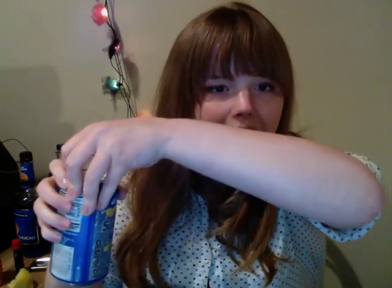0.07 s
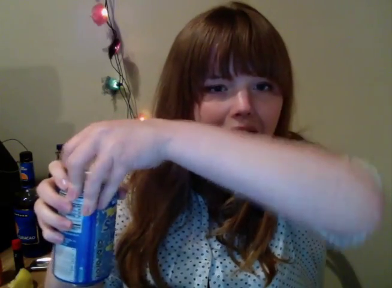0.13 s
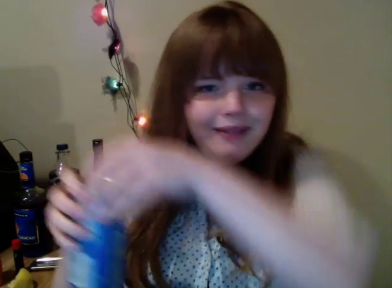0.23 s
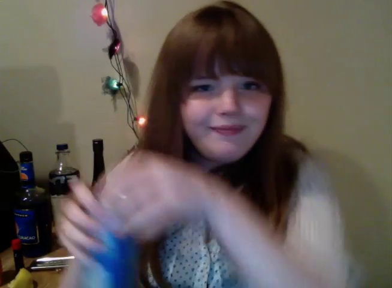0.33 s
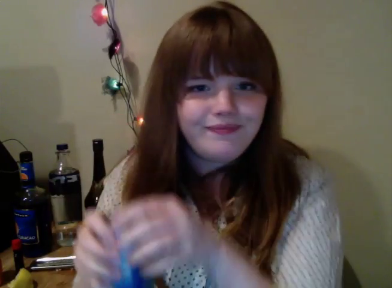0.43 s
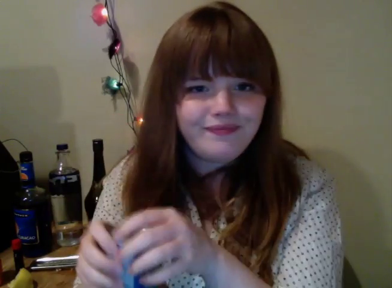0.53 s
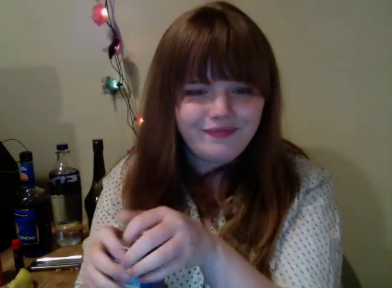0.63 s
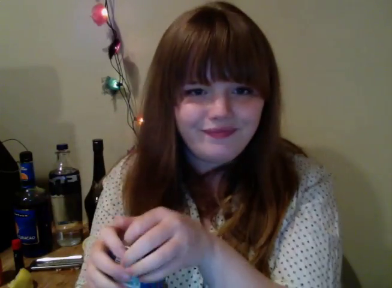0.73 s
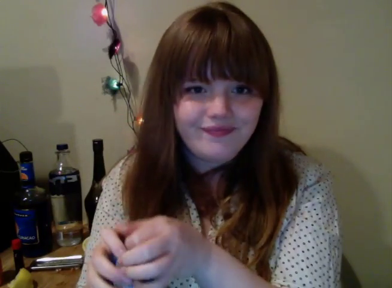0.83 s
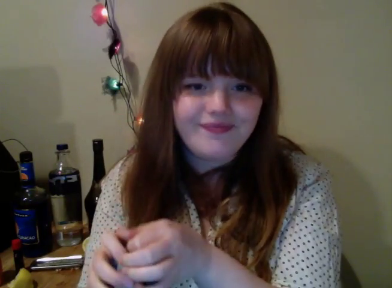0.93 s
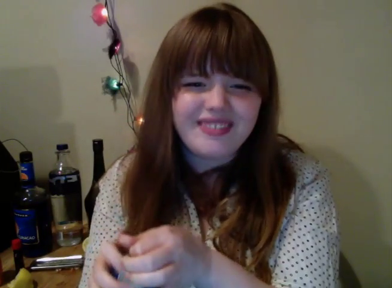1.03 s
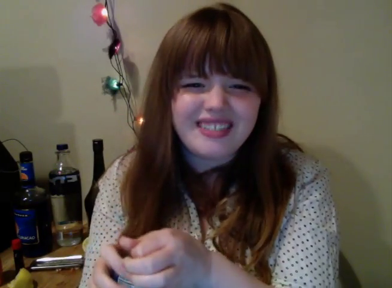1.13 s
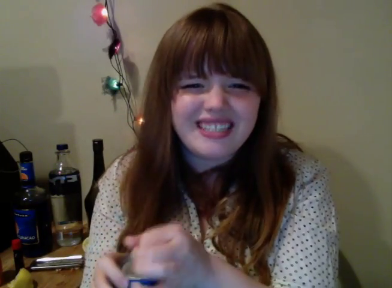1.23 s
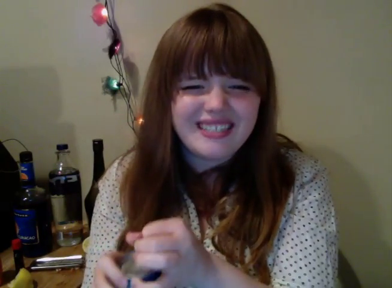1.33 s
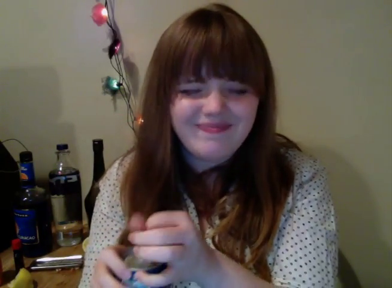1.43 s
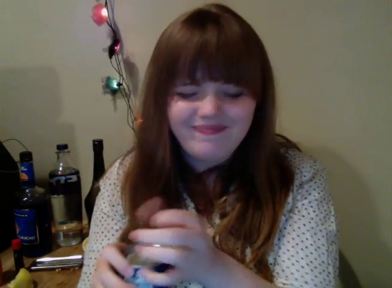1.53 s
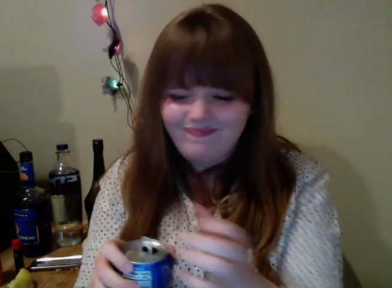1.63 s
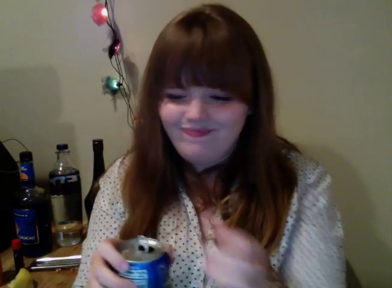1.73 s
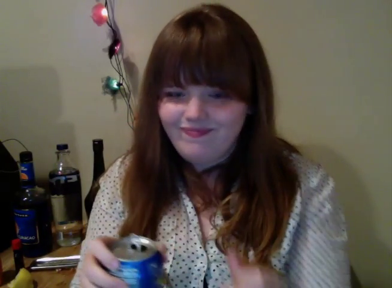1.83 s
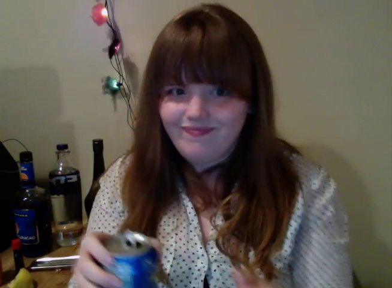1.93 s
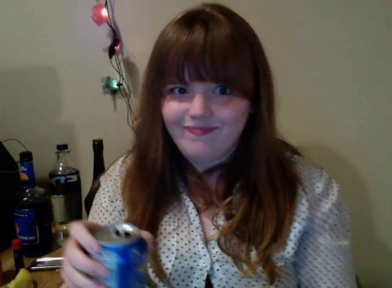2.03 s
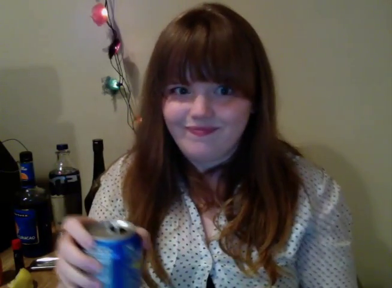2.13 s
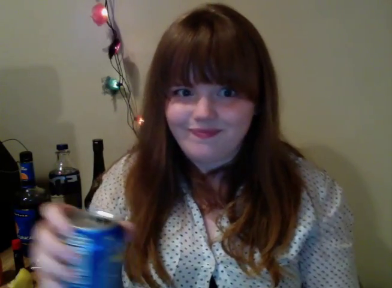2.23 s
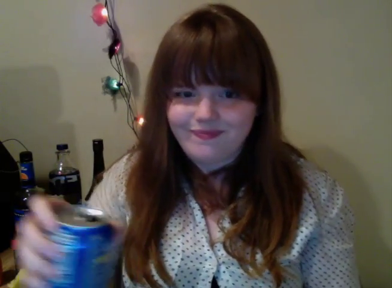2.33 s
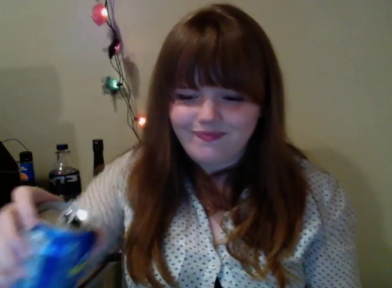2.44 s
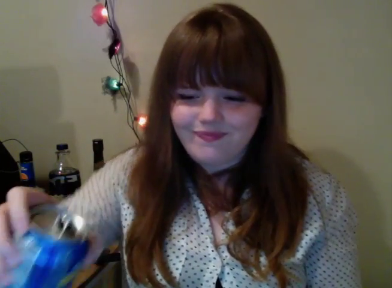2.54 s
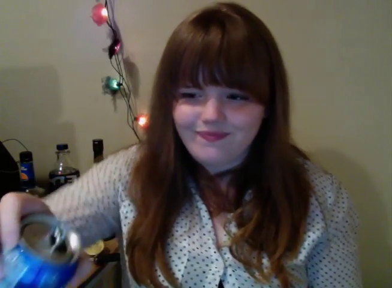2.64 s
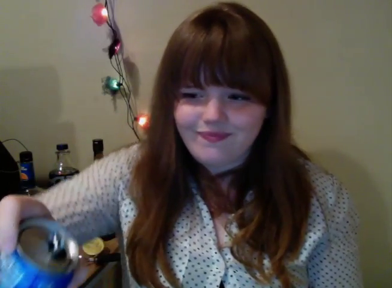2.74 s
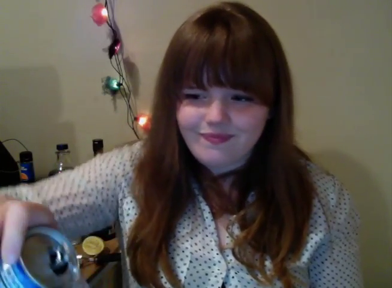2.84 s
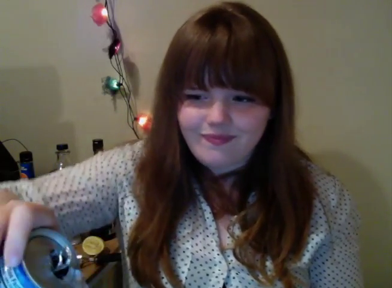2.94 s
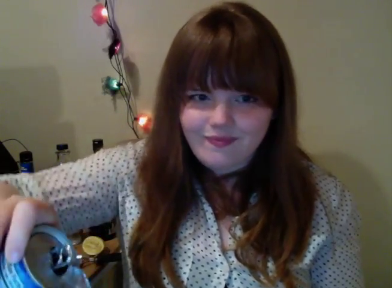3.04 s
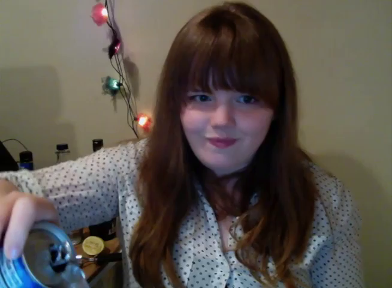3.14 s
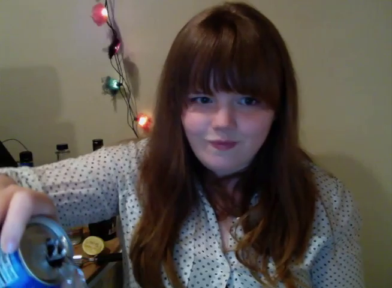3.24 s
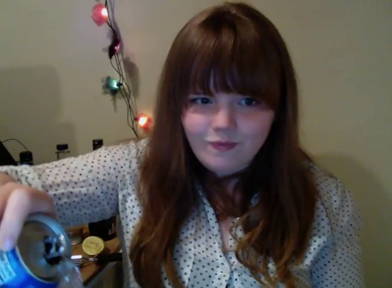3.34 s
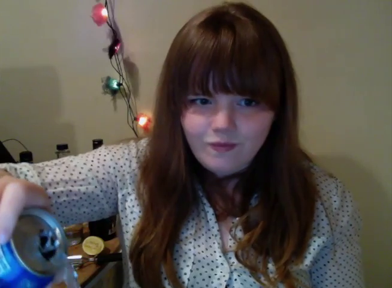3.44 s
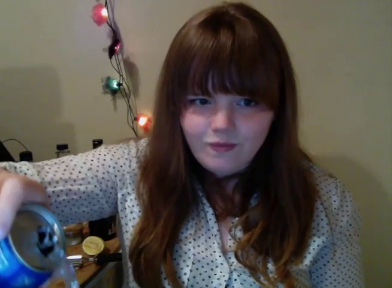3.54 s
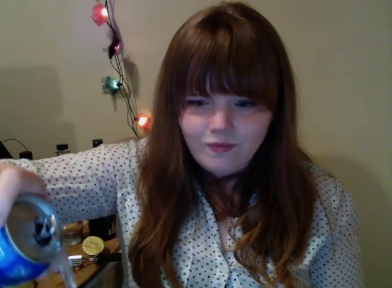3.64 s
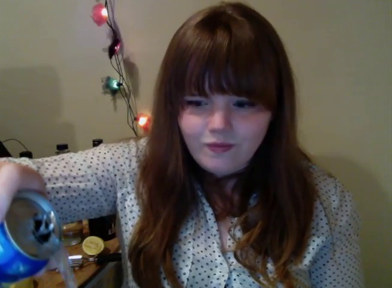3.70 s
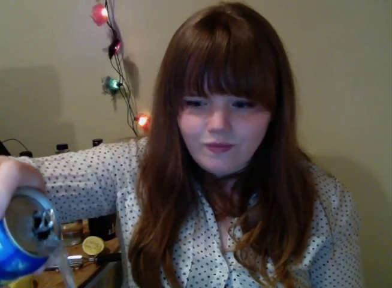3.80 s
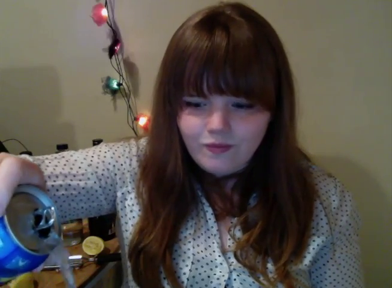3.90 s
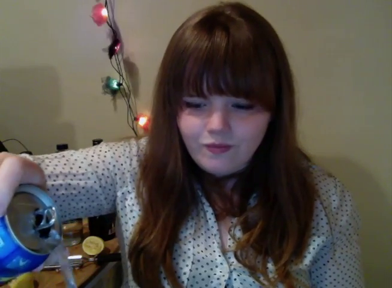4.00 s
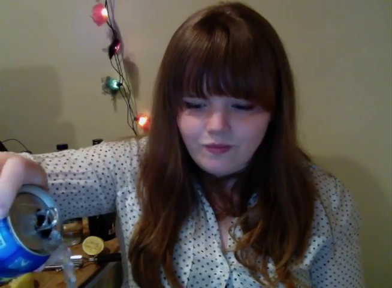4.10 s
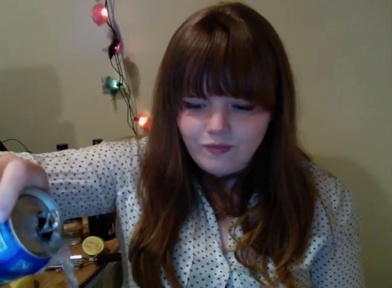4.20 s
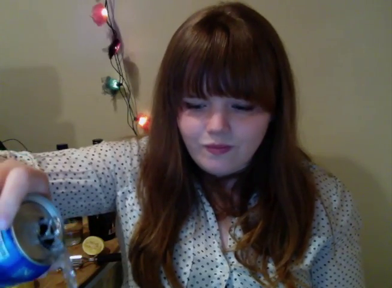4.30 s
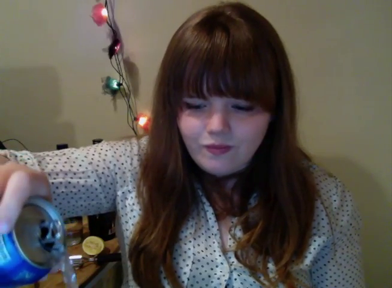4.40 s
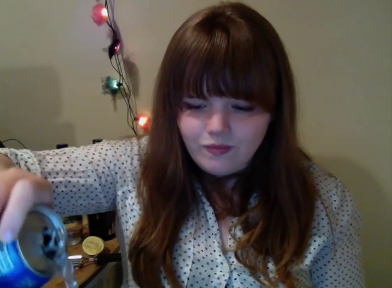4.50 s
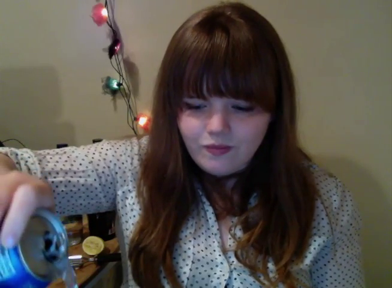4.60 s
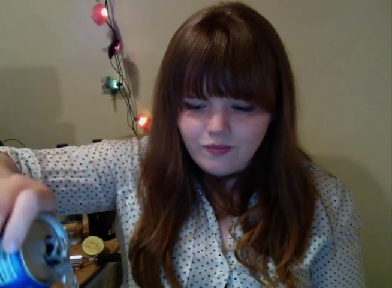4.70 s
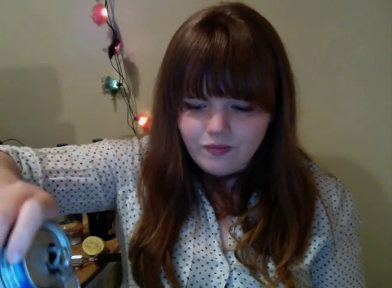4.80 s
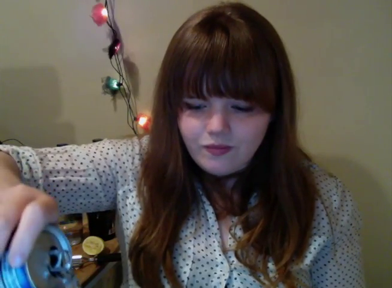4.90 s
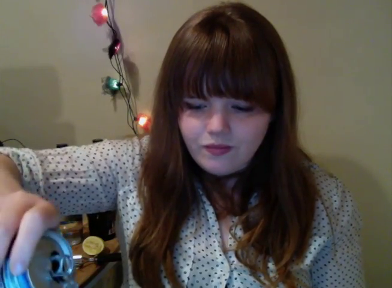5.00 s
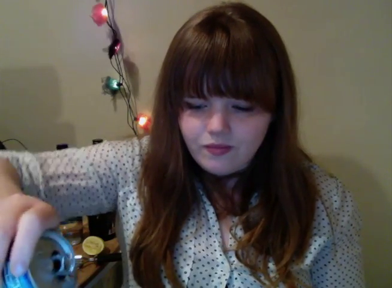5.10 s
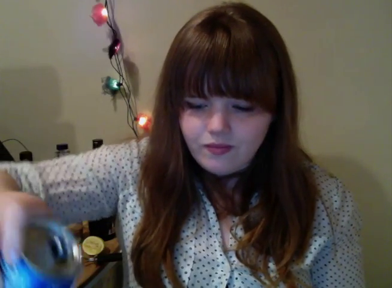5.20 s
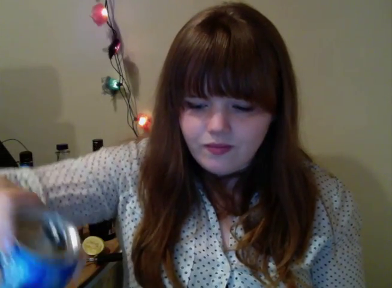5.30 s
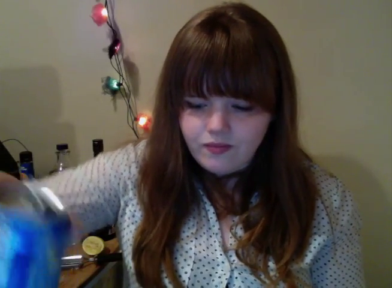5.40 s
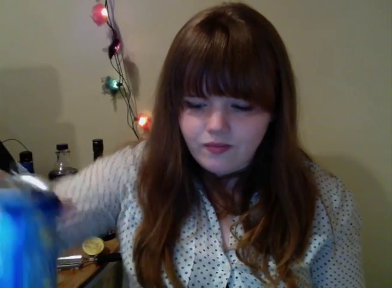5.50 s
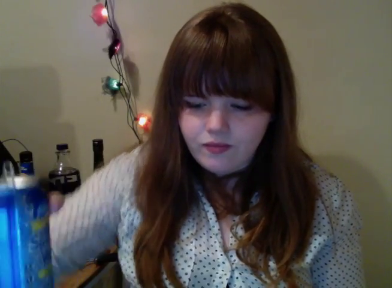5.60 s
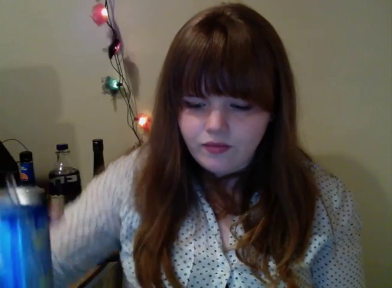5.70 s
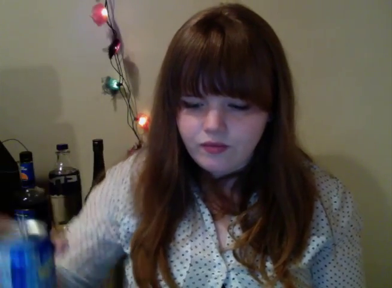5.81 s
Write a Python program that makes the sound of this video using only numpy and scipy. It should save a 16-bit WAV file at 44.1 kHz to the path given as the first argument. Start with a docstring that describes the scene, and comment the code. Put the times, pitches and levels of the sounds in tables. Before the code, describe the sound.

A metal tab flicks softly, then the can opens with two hard cracks and a very short, overloading hiss, its echo dying in the room. Nearly two seconds later the rim clinks on glass and the drink pours unevenly, light at first, then thick with bubbling plops and sizzling foam, before dwindling to drops. A low hum stays faintly behind; everything is close-miked.

```python
"""In a small kitchen, a can of seltzer is opened close to the microphone, then poured into a glass jar.
Nail and tab tick, and the lid snaps and pops, as puffs of noise and dying modes; a jet of shaped noise
bursts out and overloads the input. The drink fizzes in tiny resonances; the stream splats, plops, chirps
and crackles as gliding bubble tones and noise. An appliance hums behind as shaped noise and wavering tones."""
import sys
import numpy as np
from scipy import signal
from scipy.fft import rfft, irfft
from scipy.io import wavfile

SR = 44100
rng = np.random.default_rng(int(sys.argv[2]) if len(sys.argv) > 2 else 0)


def master_out(mix):
    """Clip the mix to full scale and print it as 16-bit PCM to the path in sys.argv[1]."""
    frames = np.transpose(np.atleast_2d(mix))
    ceiling = np.clip(frames, -1, 1)
    pcm = np.round(ceiling * 32767).astype(np.int16)
    wavfile.write(sys.argv[1], SR, pcm)


N = 258029
TIME = np.arange(N) / SR   # [s]

# Appliance: noise spectrum (frequency [Hz], density [dB per Hz])
WHIRR_SPECTRUM = [(15, -71), (25, -39), (48, -17.5), (87, -36), (114, -12), (263, -13), (354, -10),
                  (416, -21.5), (714, -25), (775, -21), (1040, -28.5), (2410, -31), (5430, -35.5),
                  (13200, -48.5), (16000, -58)]
# Appliance: whirr level (time [s], level [dB])
WHIRR_LEVEL = [(0.0, -62), (0.86, -65), (1.5, -60), (2.43, -68.5), (2.95, -67), (3.2, -59.5), (4.7, -60),
               (5.85, -63.5)]
# Appliance: tones (frequency [Hz], level relative to the whirr [dB])
HUM_TONES = [(117, -19.5), (352, -1), (764, -15), (2772, -22.5), (13006, -33)]

# Tab slipping off the nail and springing back (time [s], level [dB])
TAB_FLICKS = [(0.138, -40.5)]
# Modes of the tab (frequency [Hz], relative level [dB], t60 [s])
TAB_MODES = [(927, -10.5, 0.07), (1890, -1, 0.024), (1990, -23, 0.0071), (3370, -7.5, 0.039),
             (4230, -3, 0.023), (5680, -4, 0.018), (6750, -4, 0.05), (8170, -8.5, 0.013)]
# Fingers and nail ticking on the can (time [s], level [dB], frequency [Hz])
FINGER_TICKS = [(0.569, -52, 1978), (0.618, -55.5, 5500), (0.618, -64, 10100), (0.885, -47.5, 10000),
                (0.921, -50.5, 14500), (0.926, -57, 2200), (2.455, -61, 2450)]

# Sealed lid snapping under the lever (time [s], level [dB], brightness [dB per octave])
LID_SNAPS = [(0.961, -2, 1.5), (0.9681, -13, 6), (1.1157, -15, 9), (1.1189, -4, 10.5), (1.127, -8.5, 12)]
# Modes of the sealed lid (frequency [Hz], relative level [dB], t60 [s])
LID_MODES = [(1210, -7.5, 0.0079), (1800, -6.5, 0.011), (2200, -2.5, .009), (3700, -18.5, 0.0067),
             (5260, -7.5, 0.02), (5560, -6.5, 0.011), (6190, -9.5, 0.0022), (10000, -17, 0.0053)]

# Gas jet spectrum (frequency [Hz], density [dB per Hz])
JET_SPECTRUM = [(30, -23), (100, -33.5), (200, -24), (330, -13), (500, -23), (1000, -2), (1600, -4.5),
                (2300, 2.5), (3200, -1.5), (4300, 3), (7000, -6), (9500, 0), (12500, -5.5), (16000, -14.5)]
# Resonances of the gas pocket under the lid (frequency [Hz], width [Hz], gain [dB])
HEADSPACE_MODES = [(1210, 100, 1), (2204, 220, -2.5), (3962, 380, 2)]
# Spectrum of the fizz in the can (frequency [Hz], density [dB per Hz])
CAN_FIZZ_SPECTRUM = [(290, -23), (500, -6.5), (1080, 0), (2390, -5.5), (3460, -2), (4350, -6.5),
                     (4800, -8.5), (15000, -22)]
# Gas leaks through the first crack, bursts out as the score tears, and dies as the pressure falls
LEAK_S, LEAK_DB = 1.118, -31
BURST_S, BURST_DB, BURST_ATTACK_S, BURST_HOLD_S, BURST_FALL_DB_PER_S = 1.146, -4, 0.0045, 0.01, 520.5
# The rest of the gas streams out more gently
VENT_DB, VENT_HOLD_S, VENT_FALL_DB_PER_S = -18.5, 0.075, 280.5
# The drink fizzes in the open can, holds a moment, then settles
CAN_FIZZ_DB, CAN_FIZZ_HOLD_S, CAN_FIZZ_FALL_DB_PER_S = -68, 0.62, 23

# Flap tearing and folding into the can (time [s], level [dB])
FLAP_FOLDS = [(1.2205, -3.5)]
# Modes of the opened lid (frequency [Hz], relative level [dB], t60 [s])
FLAP_MODES = [(805, -8, 0.037), (942, 0, 0.021), (1071, 1, 0.039), (1193, -6.5, 0.076), (1358, -4.5, 0.04),
              (1455, -11, 0.045), (2200, -11, 0.048), (3330, -21.5, 0.05), (4093, -10.5, 0.049)]

# Rim of the can knocking on the jar as it tips (time [s], level [dB])
RIM_KNOCKS = [(2.983, -27.5), (2.988, -4)]
# Modes of rim against glass (frequency [Hz], relative level [dB], t60 [s])
RIM_MODES = [(1620, -14.5, 0.013), (2200, -19.5, 0.028), (2457, -6, 0.015), (2650, -19, 0.024),
             (3390, -22, .04), (4100, -27, 0.024), (5900, -35, .08), (7160, -30, .04), (10130, -30, 0.027)]
# Drops striking the glass so that its wall rings (time [s], level [dB])
WALL_STRIKES = [(3.055, -39), (4.51, -37.5), (5.0087, -33)]
WALL_HZ, WALL_T60_S = 2802, 0.092

# Strength of the pour (time [s], churning [dB], fizzing [dB])
POUR_STRENGTH = [(3.12, -43, -56.5), (3.17, -44.5, -52), (3.72, -43, -48), (3.84, -41, -40),
                 (3.97, -33.5, -48), (4.21, -35.5, -54.5), (4.51, -42.5, -57.5), (4.66, -50, -58.5),
                 (4.79, -55.5, -77), (5.04, -46.5, -63), (5.24, -79, -74.5), (5.85, -85, -82)]
# Spectrum of the churning bubbles (frequency [Hz], density [dB per Hz])
CHURN_SPECTRUM = [(210, -37.5), (350, -9), (381, -24.5), (945, -1), (1220, -8.5), (1530, -3), (2020, -7.5),
                  (3750, -9), (4500, -15), (5850, -48), (9900, -120)]
# Spectrum of the crackling foam (frequency [Hz], density [dB per Hz])
FOAM_SPECTRUM = [(1760, -38), (3000, -26.5), (5440, -4), (6090, -26), (6710, -15), (10800, -1.5),
                 (16000, -16.5)]
CHURN_DB, FOAM_DB = -7.5, -2.5   # relative to the strength of the pour
CHURN_SURGE_DB, FOAM_SURGE_DB = 8.5, 15.5   # greatest swing either way as the stream breaks into lumps

# Heaviest lumps landing (time [s], bubble level [dB], bubble frequency [Hz], splash level [dB])
LUMPS = [(2.988, -13.5, 690, -41), (3.017, -24, 664, -22.5), (3.078, -24, 636, -32.5),
         (3.429, -29.5, 725, -31.5), (3.585, -35, 900, -47), (3.756, -38, 930, -32),
         (3.787, -26.5, 950, -28.5), (3.821, -31, 925, -27), (3.857, -25, 880, -25.5),
         (3.912, -28, 710, -25), (3.947, -26.5, 900, -27), (3.978, -31.5, 884, -29.5),
         (4.036, -21.5, 748, -24.5), (4.071, -28, 793, -34), (4.097, -25, 773, -28.5),
         (4.108, -25, 1056, -40), (4.181, -27.5, 714, -31), (4.21, -18.5, 767, -30.5),
         (4.262, -23, 810, -35), (4.29, -22.5, 898, -23.5), (4.312, -21.5, 754, -30),
         (4.375, -19.5, 893, -36), (4.405, -25.5, 1010, -53), (4.469, -20, 817, -56),
         (4.579, -31.5, 970, -37.5), (4.96, -34.5, 1038, -47), (5.134, -29.5, 942, -49)]
# Large bubbles, some short plops and some ringing on, with pitch rising or falling
# (time [s], level [dB], frequency [Hz], rise [octaves per s], t60 [s])
LARGE_BUBBLES = [(2.99, -32, 680, 1.4, 0.47), (3.115, -30, 742, 7.5, 0.13), (3.33, -34, 735, 0.9, 0.54),
                 (3.866, -15.5, 953, -3.5, .05), (4.647, -26.5, 786, 4.5, 0.17),
                 (5.048, -38, 764, 3.5, 0.35), (5.15, -33, 860, 2.5, 0.068)]
# Single drops, each trapping a small chirping bubble (time [s], level [dB], frequency [Hz])
SINGLE_DROPS = [(3.054, -19.5, 2620), (3.198, -25, 2550), (3.376, -32.5, 2560), (3.466, -26, 2300),
                (3.607, -34.5, 2400), (3.7134, -28, 2330), (4.012, -21.5, 3440), (4.452, -29, 3460),
                (4.507, -28, 2800), (4.605, -30, 2750), (4.743, -28, 2337), (4.824, -40, 3030),
                (4.984, -29, 1540), (5.009, -26.5, 2835)]
# Loudest bursts of spray on the glass (time [s], level [dB], frequency [Hz])
SPRAY_BURSTS = [(2.989, -21.5, 8100), (3.155, -34, 8230), (3.26, -22.5, 6710), (3.4, -27.5, 5560),
                (3.498, -36, 10300), (3.571, -30.5, 7460), (3.6806, -26, 6930), (3.756, -18.5, 8570),
                (3.823, -21, 5140), (3.913, -29, 10000), (4.143, -30, 10940), (4.232, -25.5, 5550),
                (4.3128, -17.5, 6900), (4.336, -26, 9170), (4.439, -35.5, 5470), (4.507, -31.5, 10360),
                (4.607, -27.5, 7000), (4.647, -33, 5300), (4.8808, -35.5, 10400), (4.966, -36, 5900),
                (5.1123, -39.5, 8250), (5.1903, -40, 7700)]
PLOP_T60_S, PLOP_RISE_OCTAVES_PER_S = 0.04, 6.5
DROP_SLAP_DB = -16   # a drop striking the surface, relative to its bubble
CHIRP_RISE_OCTAVES_PER_S, CHIRP_T60_S = 48, 0.022
# Parts of a splash, relative to its level
SPLAT_DB, SLAP_DB, THROWN_CHIRP_DB, THROWN_SPRAY_DB = 0.5, -8, -1.5, -7.5
THROWN_CHIRP_HZ, THROWN_SPRAY_HZ = 2300, 6050   # middle of the range in which they fall
CHIRP_SCATTER_S, CHIRP_STEP_DB = 0.02, 5   # three chirps start within this time, each weaker than the last
# Droplets of one burst of spray: time over which they fall, level, pitch range
SPRAY_SCATTER_S, SPRAY_DROPLET_DB, SPRAY_OCTAVES = 0.023, -8.5, 1.47

# Resonances of the jar's air and wall (frequency [Hz], width [Hz], gain [dB])
JAR_MODES = [(754, 15, 4), (1057, 450, -10), (1537, 20, 1), (2800, 410, -3.5), (4110, 56, 8.5),
             (4370, 39, 6.5), (5550, 160, 4), (6710, 33, 4)]
# Reverberation of the kitchen (frequency [Hz], t60 [s])
ROOM_DECAY = [(100, .42), (500, .38), (1200, .43), (2200, .45), (4000, .43), (8000, .39), (12000, .33),
              (15000, .26)]
# Near echoes in the kitchen (delay [s], level [dB])
NEAR_ECHOES = [(.0031, -16), (.0074, -10), (0.0123, -28)]
CUTOFF_HZ = 16100


def amp(db):
    """Logarithmic level: decibels become a linear gain."""
    return 10 ** (np.asarray(db) / 20)


def rms_one(x):
    """Power normalisation: scale to unit rms."""
    return x / np.sqrt(np.mean(x ** 2) + 1e-20)


def in_time(rows):
    """Linear interpolation in time of each column of a curve."""
    s, *columns = np.transpose(rows)
    return [np.interp(TIME, s, column) for column in columns]


def at_hz(points, hz):
    """Linear interpolation on a logarithmic frequency axis."""
    table_hz, value = np.transpose(points)
    return np.interp(np.log(np.maximum(hz, 1)), np.log(table_hz), value)


def add(out, s, sound):
    """Superposition: add a short sound into `out` from time s."""
    i = max(round(s * SR), 0)
    out[i:i + len(sound)] += sound[:N - i]


def band(x, low_hz, high_hz):
    """Causal band-pass filtering."""
    top_hz = min(high_hz, 0.45 * SR)
    edges_hz = [min(low_hz, top_hz / 2 ** 0.1), top_hz]
    return signal.sosfilt(signal.butter(2, edges_hz, "band", fs=SR, output="sos"), x)


def thin(x, hz):
    """Radiation efficiency: small sources radiate little bass, here below hz."""
    return signal.sosfilt(signal.butter(4, hz, "high", fs=SR, output="sos"), x + 1e-18)


def colour(x, spectrum):
    """Spectral shaping: weight a flat sound by frequency, then set its rms to 1."""
    hz = np.arange(N // 2 + 1) * SR / N
    return rms_one(irfft(rfft(x) * amp(at_hz(spectrum, hz)), N))


def envelope(start_s, attack_s, hold_s, fall_db_per_s):
    """Exponential decay: rise to 1, hold, then fall steadily in dB."""
    t = TIME - start_s
    fall_db = -fall_db_per_s * np.maximum(t - attack_s - hold_s, 0)
    return np.clip(t / attack_s, 0, 1) * amp(fall_db)


def ping(hz, t60, rise=0, swell=0.42, phase=0):
    """Damped oscillation: builds up over `swell` cycles, glides `rise` octaves per s (at most one up)."""
    t60 = max(t60, 1e-3)
    t = TIME[:int(t60 * SR)]
    gliding_hz = np.minimum(hz * 2 ** np.minimum(rise * t, 1), SR / 2)
    turns = np.cumsum(gliding_hz) / SR
    onset = 1 - np.exp(-(turns / swell) ** 2)
    return np.sin(2 * np.pi * (turns + phase)) * onset * 1e-3 ** (t / t60)


def puff(hz, octaves, t60):
    """Decaying turbulence: a burst of noise in a band around hz."""
    t, half = TIME[:SR // 10], 2 ** (octaves / 2)
    noise = rms_one(band(rng.standard_normal(len(t)), hz / half, hz * half))
    return noise * 1e-3 ** (t / t60)


def resonance(x, hz, width):
    """Two-pole resonance: gain 1 at its peak."""
    r = np.exp(-np.pi * width / SR)   # pole radius
    zeros = np.array([1, 0, -1]) * (1 - r * r) / 2
    poles = [1, -2 * r * np.cos(2 * np.pi * hz / SR), r * r]
    return signal.lfilter(zeros, poles, x + 1e-18)


def cavity(x, modes):
    """Cavity resonance: the sound together with the modes that it excites."""
    return x + sum(amp(db) * resonance(x, hz, width) for hz, width, db in modes)


def appliance():
    """Sustained vibration in noise: a low whirr with slightly wandering tones; its level wavers."""
    whirr = colour(rng.standard_normal(N), WHIRR_SPECTRUM)
    wander_points = rng.standard_normal(size=80)
    wander_hz = 4 * np.interp(TIME, np.linspace(0, N / SR, num=80), wander_points)
    tones = np.zeros(N)
    for hz, db in HUM_TONES:
        turns = np.cumsum(hz + wander_hz) / SR
        tones += amp(db) * np.sqrt(2) * np.sin(2 * np.pi * turns)
    return amp(in_time(WHIRR_LEVEL)[0]) * (whirr + tones)


def fingers():
    """Impact and free vibration: the nail ticks; the tab slips, springs back and rings in its modes."""
    out = np.zeros(N)
    for s, db in TAB_FLICKS:
        for hz, mode_db, t60 in TAB_MODES:
            add(out, s, amp(db + mode_db) * ping(hz, t60))
    for s, db, hz in FINGER_TICKS:
        add(out, s, amp(db) * puff(hz, octaves=0.2, t60=0.025))
    return out


def tab():
    """Modal excitation: the lever snaps the taut lid; brighter snaps drive its high modes harder."""
    out = np.zeros(N)
    for s, db, tilt_db in LID_SNAPS:
        tear = puff(6000, octaves=2, t60=0.010)
        add(out, s, amp(db + 2 * tilt_db - 23) * tear)
        for hz, mode_db, t60 in LID_MODES:
            bright_db = tilt_db * np.log2(hz / 4000)
            add(out, s, amp(db + mode_db + bright_db) * ping(hz, t60, phase=rng.random()))
    return thin(out, hz=490)


def grains(per_s, low_hz, high_hz, cycles, spread_db, count=22):
    """Random impulses exciting resonances: tiny bubbles of uneven size, each ringing a few cycles."""
    at = np.flatnonzero(rng.random(N) < per_s / SR)
    sizes = amp(spread_db * np.minimum(rng.exponential(1, len(at)), 3.5))
    sizes = sizes * rng.choice([-1, 1], len(at))
    dealt = rng.integers(0, count, len(at))   # which pitch each bubble takes
    out = np.zeros(N)
    for k, hz in enumerate(np.geomspace(low_hz, min(high_hz, CUTOFF_HZ), count)):
        clicks = np.zeros(N)
        clicks[at[dealt == k]] = sizes[dealt == k]
        out += resonance(clicks, hz, 2 * hz / cycles)
    return rms_one(out)


def gas():
    """Jet turbulence: gas through the torn score rings the headspace; the drink then fizzes in the can."""
    jet = rms_one(cavity(colour(rng.standard_normal(N), JET_SPECTRUM), HEADSPACE_MODES))
    fizz = colour(grains(7600, 600, 15000, cycles=2.8, spread_db=6), CAN_FIZZ_SPECTRUM)
    leak = amp(LEAK_DB) * (TIME > LEAK_S) * (TIME < BURST_S + BURST_ATTACK_S)
    burst = amp(BURST_DB) * envelope(BURST_S, BURST_ATTACK_S, BURST_HOLD_S, BURST_FALL_DB_PER_S)
    vent = amp(VENT_DB) * envelope(BURST_S, BURST_ATTACK_S, VENT_HOLD_S, VENT_FALL_DB_PER_S)
    settling = envelope(BURST_S, BURST_ATTACK_S, CAN_FIZZ_HOLD_S, CAN_FIZZ_FALL_DB_PER_S)
    return (leak + burst + vent) * jet + amp(CAN_FIZZ_DB) * settling * fizz


def flap():
    """Beating of neighbouring modes: the flap folds in with a hollow pop."""
    out = np.zeros(N)
    for s, db in FLAP_FOLDS:
        for k, (hz, mode_db, t60) in enumerate(FLAP_MODES):
            sign = (-1) ** k   # neighbours start opposed, so the pop swells and beats
            add(out, s, sign * amp(db + mode_db) * ping(hz, t60))
    return thin(out, hz=490)


def knock():
    """Modal impact: the can touches the jar as the first liquid lands; stray drops ring the glass."""
    out = np.zeros(N)
    for s, db in RIM_KNOCKS:
        for hz, mode_db, t60 in RIM_MODES:
            add(out, s, amp(db + mode_db) * ping(hz, t60, phase=rng.random()))
    for s, db in WALL_STRIKES:
        add(out, s, amp(db) * ping(WALL_HZ, WALL_T60_S))
    return thin(out, hz=600)


def surges(count):
    """Irregular modulation: a swing between -1 and 1, with `count` turns over the whole scene."""
    at = np.sort(np.arange(count) + rng.uniform(-0.6, 0.6, count)) * N / SR / count
    heights = (-1) ** np.arange(count) * rng.uniform(0.3, 1, count)
    return np.interp(TIME, at, heights)


def bubbles(per_s, low_hz, high_hz, cycles, climb, spread_db):
    """Bubble oscillation: each rings about `cycles` cycles and climbs up to `climb` octaves as it dies."""
    out, start, end = np.zeros(N), LUMPS[0][0], N / SR
    for when, pitch, size, life, lift in rng.random((int(per_s * (end - start)), 5)):
        hz = low_hz * (high_hz / low_hz) ** pitch
        t60 = cycles * 2 ** (2 * life - 1) / hz
        gain = amp(spread_db * size ** 2)   # many small, few large
        bubble = ping(hz, t60, lift * climb / t60, swell=cycles / 40)
        add(out, start + when * (end - start), gain * bubble)
    return out


def stream():
    """Air entrainment: the falling drink churns up chirping bubbles and a foam that crackles in spurts."""
    churn_db, foam_db = in_time(POUR_STRENGTH)
    coarse = bubbles(420, 459, 4700, cycles=30.2, climb=0.77, spread_db=14.5)
    fine = bubbles(1100, 2990, 15870, cycles=65, climb=0.08, spread_db=12)
    churn = colour(amp(CHURN_SURGE_DB * surges(count=200)) * coarse, CHURN_SPECTRUM)
    foam = colour(amp(FOAM_SURGE_DB * surges(count=280)) * fine, FOAM_SPECTRUM)
    pour = amp(churn_db + CHURN_DB) * churn + amp(foam_db + FOAM_DB) * foam
    return pour * (TIME > LUMPS[0][0])


def chirp(hz):
    """Rising bubble resonance: the pitch of a small bubble sweeps up through hz."""
    start_hz = hz / 2 ** (CHIRP_RISE_OCTAVES_PER_S * 0.003)   # passes hz after 3 ms
    return ping(start_hz, CHIRP_T60_S, CHIRP_RISE_OCTAVES_PER_S, swell=4)


def spray(hz):
    """Scattered resonances: one tiny bubble at hz, then a thinning shower of weaker ones around it."""
    out = np.zeros(N)
    add(out, 0, ping(hz, t60=0.014, rise=0.5, swell=3.2))
    for delay, octaves in rng.random((28, 2)):
        droplet_hz = hz * 2 ** (SPRAY_OCTAVES * (octaves - 0.5))
        droplet = ping(droplet_hz, t60=0.007, swell=3.1)
        add(out, SPRAY_SCATTER_S * delay ** 2, amp(SPRAY_DROPLET_DB - 3.2 * delay) * droplet)
    return out[:SR // 10]


def splash():
    """Liquid impact: a dull splat, a slap on the surface, a few chirping bubbles and a burst of spray."""
    out = np.zeros(N)
    add(out, 0, amp(SPLAT_DB) * puff(518, octaves=0.87, t60=0.027))
    add(out, 0, amp(SLAP_DB) * puff(2350, octaves=1.7, t60=0.0075))
    for k, (delay, octaves) in enumerate(rng.random((3, 2))):
        hz = THROWN_CHIRP_HZ * 2 ** (1.45 * (octaves - 0.5))
        add(out, CHIRP_SCATTER_S * delay * k / 2, amp(THROWN_CHIRP_DB - CHIRP_STEP_DB * k) * chirp(hz))
    spray_hz = THROWN_SPRAY_HZ * 2 ** rng.uniform(-0.524, 0.52)
    add(out, 0, amp(THROWN_SPRAY_DB) * spray(spray_hz))
    return out[:SR // 10]


def splashes():
    """Bubble resonance near a free surface: each lump traps bubbles whose pitch climbs as they near it."""
    out = np.zeros(N)
    for s, db, hz, splash_db in LUMPS:
        add(out, s, amp(db) * ping(hz, PLOP_T60_S, PLOP_RISE_OCTAVES_PER_S))
        add(out, s, amp(splash_db) * splash())
        for delay, octaves in rng.random((3, 2)):   # smaller bubbles break off
            small_hz = hz * 2 ** (0.302 + 1.1 * octaves)
            small_db = db - 12.5 - 4.8 * octaves
            small = ping(small_hz, t60=0.021, rise=47, swell=1)
            add(out, s + 0.012 * delay ** 2, amp(small_db) * small)
    for s, db, hz, rise, t60 in LARGE_BUBBLES:
        add(out, s, amp(db) * ping(hz, t60, rise, swell=4.3))
    for s, db, hz in SINGLE_DROPS:
        add(out, s, amp(db) * chirp(hz))
        add(out, s, amp(db + DROP_SLAP_DB) * puff(hz * 1.1, octaves=0.69, t60=0.037))
    for s, db, hz in SPRAY_BURSTS:
        add(out, s, amp(db) * spray(hz))
    return thin(out, hz=270)


def kitchen(x, wet_db):
    """Reverberation: a few near echoes and a diffuse tail whose decay time depends on frequency."""
    t = TIME[:SR * 3 // 4]
    edges_hz = np.geomspace(60, 19000, 15)
    response = np.zeros(len(t))
    for low_hz, high_hz in zip(edges_hz, edges_hz[1:]):
        dying = 1e-3 ** (t / at_hz(ROOM_DECAY, np.sqrt(low_hz * high_hz)))
        response += band(rng.standard_normal(len(t)), low_hz, high_hz) * dying
    response *= np.clip(t / 0.007, 0, 1)   # the tail builds up over 7 ms
    response *= amp(wet_db) / np.sqrt(np.sum(response ** 2))
    for delay, db in NEAR_ECHOES:
        response[round(delay * SR)] += amp(db)
    return x + signal.fftconvolve(x, response)[:N]


def scene():
    """Superposition of sources: the can near the microphone, the jar, the kitchen around them."""
    can = kitchen(fingers() + tab() + gas() + flap(), wet_db=-1.5)
    jar = kitchen(cavity(knock() + stream() + splashes(), JAR_MODES), wet_db=-8)
    return (appliance() + can + amp(-1.5) * jar)[None]


def record(dry):
    """Hard clipping and low-pass filtering: the input overloads on the burst, and the top is cut."""
    clipped = np.clip(dry, -1, 1)
    return signal.sosfilt(signal.ellip(10, 0.1, 70, CUTOFF_HZ, fs=SR, output="sos"), clipped)


dry = scene()
out = record(dry)
master_out(out)
```